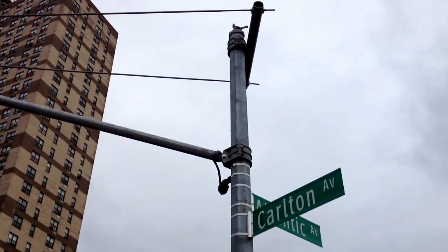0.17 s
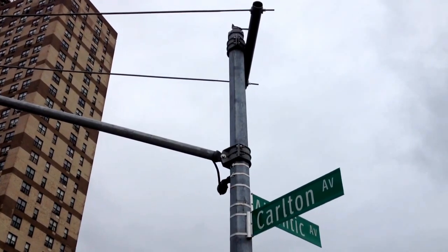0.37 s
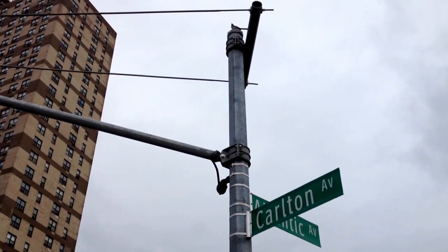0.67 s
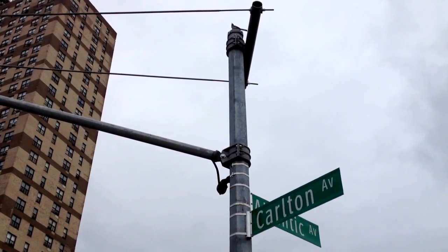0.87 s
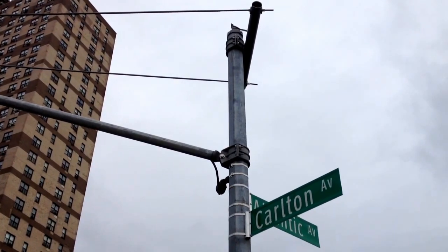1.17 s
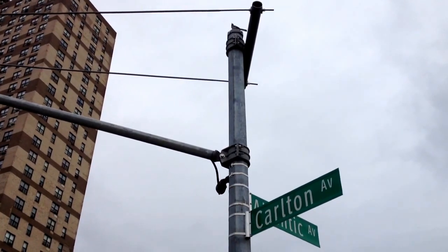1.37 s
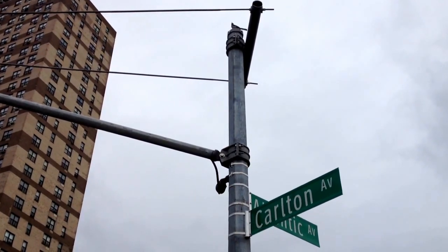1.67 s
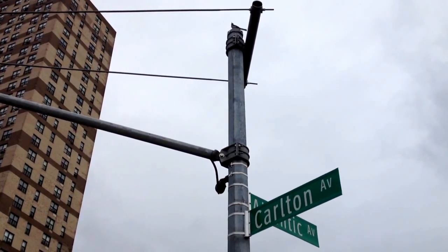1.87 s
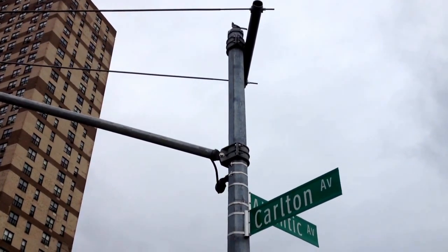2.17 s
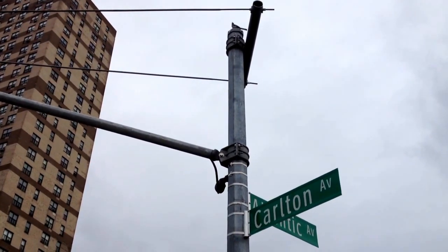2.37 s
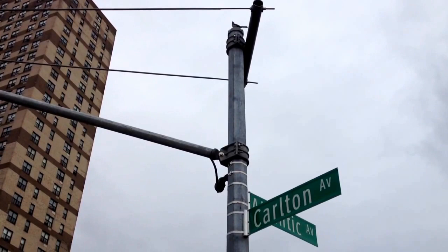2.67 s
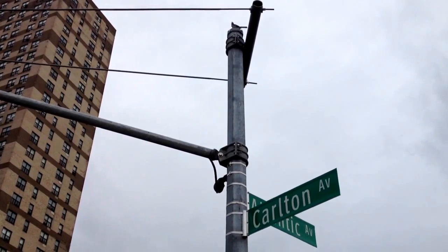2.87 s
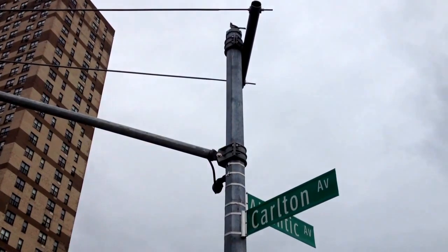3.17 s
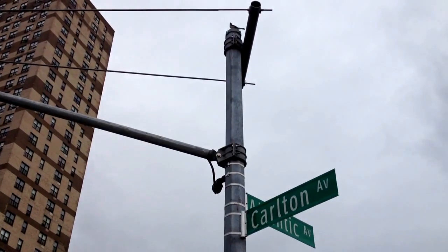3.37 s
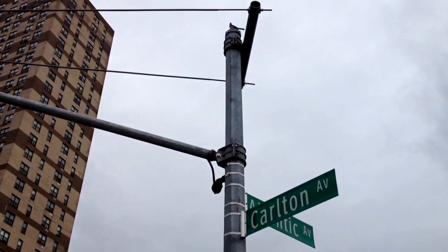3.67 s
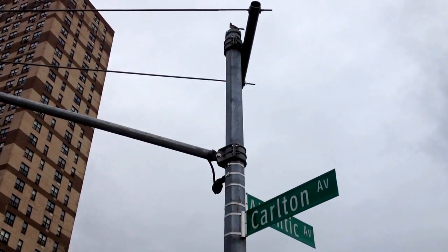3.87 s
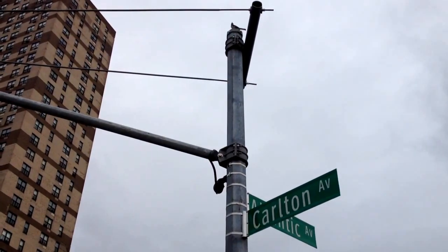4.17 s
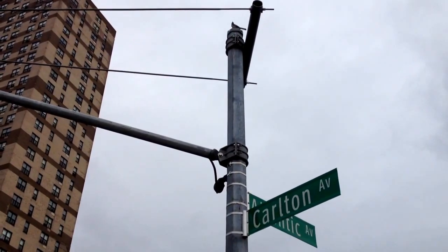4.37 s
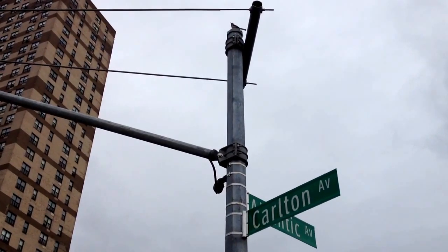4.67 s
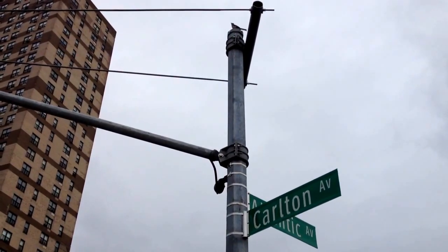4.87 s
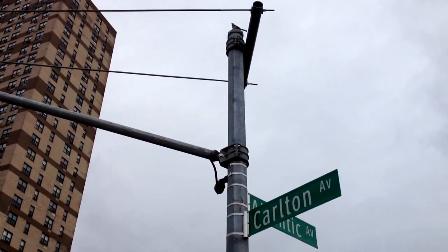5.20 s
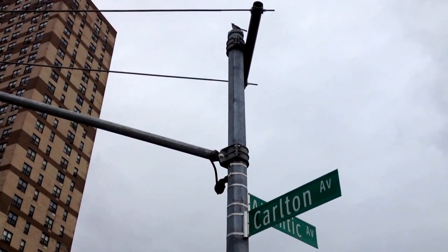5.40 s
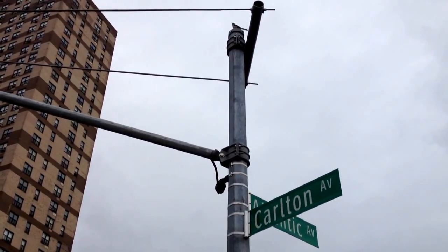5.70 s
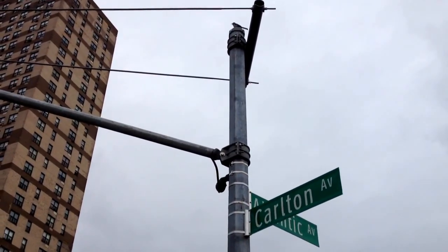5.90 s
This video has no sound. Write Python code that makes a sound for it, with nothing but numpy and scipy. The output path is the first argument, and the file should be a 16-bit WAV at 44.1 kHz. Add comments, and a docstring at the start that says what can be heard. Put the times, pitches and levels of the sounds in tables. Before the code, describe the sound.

A low, steady rumble of distant city traffic runs through all six seconds, with a faint wavering hum inside it. In front of it, a small songbird sings very short, high, sharp notes that slide downward. Two clean falling whistles come at about 0.2 and 0.7 seconds. After a pause, a rougher, broken falling note sounds at 2 seconds. Six sharp, slightly raspy chips follow, the first at 2.5 seconds and the others about every half second from 3.4 to 5.4 seconds. Two softer sliding notes come in quick succession just before 6 seconds. The buildings along the street return a faint echo of each note. A few soft, dull thumps sit in the background, most noticeably near 0.5, 1.1 and 2.6 seconds, with weaker ones later.

```python
"""Songbird on a street pole

City traffic rumbles, with a low hum and a few dull thumps. A small bird sings two clean falling
whistles, a broken falling note, six sharp chips and two soft sliding notes. The tone of its voice box
(the syrinx) glides through a throat resonance, pure when high and raspy when low.
The pavement and house fronts send back faint echoes."""
import sys
import numpy as np
from scipy import signal
from scipy.fft import rfft, irfft
from scipy.io import wavfile
from scipy.ndimage import uniform_filter1d

SR = 44100
rng = np.random.default_rng(int(sys.argv[2]) if len(sys.argv) > 2 else 0)


def master(y):
    """Save y as 16-bit WAV."""
    cut = np.clip(np.atleast_2d(y).T, -1, 1)
    pcm = np.round(cut * 32767)  # scale
    wavfile.write(sys.argv[1], SR, pcm.astype(np.int16))


N = 266319

# tone colour of the traffic: (frequency [Hz], relative level [dB])
TRAFFIC_SPECTRUM = [(25, -32), (45, -29), (65, -18), (100, -13), (160, -2.5), (300, 0), (460, -9),
                    (700, -9), (950, -13), (1700, -14), (2900, -29.5), (4800, -28.5), (8000, -41.5),
                    (15500, -50)]
# how the traffic swells and eases: (time [s], engine gain [dB], tyre gain [dB])
TRAFFIC_FLOW = [(0, -.3, 1.3), (.8, 1.7, 0.5), (1.8, 0.2, 0.7), (2.8, 1, 1), (3.6, .5, .5), (4.3, .5, 2),
                (5.1, 0.3, 2.5), (6.04, .8, 0)]
# tones of distant machinery: (pitch [Hz], level [dB])
HUM_TONES = [(121.5, -52.5), (968, -60)]
# the path the pitch takes in each kind of note: (time into the note [s], pitch [Hz])
WHISTLE = [(0, 4100), (.008, 5100), (.035, 4950), (.039, 5150), (.044, 4850), (.051, 3300), (.058, 3150),
           (.068, 3270), (.082, 3250)]
BROKEN = [(0, 1600), (.016, 3300), (.025, 5030), (.037, 4720), (.0445, 3450), (.051, 4320), (.063, 3880),
          (.069, 4080), (.075, 3100), (.083, 2700), (.103, 2250)]
CHIP = [(0, 1300), (.0135, 2480), (.032, 4370), (.062, 4245), (.0755, 4280), (.0805, 2950), (.088, 2230),
        (.107, 1550)]
LOW_SLUR = [(0, 3350), (.016, 2900), (.030, 2650), (.050, 2750)]
HIGH_SLUR = [(0, 4800), (.012, 4350), (.040, 3750), (.075, 3400)]
# kind of note: (pitch path, throat resonance [Hz], buzzes below [Hz], buzz roughness [0-1], hiss [dB])
NOTE_KINDS = { "whistle": (WHISTLE, 4710, 3550, .13, -44), "broken": (BROKEN, 4360, 3650, .7, -29),
              "chip": (CHIP, 4306, 3800, .85, -28.3), "low slur": (LOW_SLUR, 2430, 3700, .08, -40),
              "high slur": (HIGH_SLUR, 3980, 3700, .2, -30)}
# the song: (start [s], kind, length [factor], pitch [factor], pitch sag [share], late pitch lift [share],
# gain [dB], extra overtones [dB])
SONG = [ (.150, "whistle", 1.0, .995, 0, 0, -20.5, 0), (.730, "whistle", .955, 1.018, 0, 0, -22.3, 2),
        (1.990, "broken", 1.0, 1.0, 0, 0, -17.7, 0), (2.548, "chip", .96, 1.012, .02, .03, -24.5, 1),
        (3.426, "chip", .92, 1.005, 0, .05, -23.9, 0), (3.9034, "chip", 1.085, 1.0, .035, 0, -22.6, -1.5),
        (4.4736, "chip", .99, 1.008, 0, .055, -24.4, 0), (4.914, "chip", 1.02, 1.021, .005, .02, -23.3, 1),
        (5.370, "chip", 1.0, 1.0, 0, 0, -22.6, 0), (5.843, "low slur", 1.0, 1.0, 0, 0, -25, 0),
        (5.960, "high slur", 1.0, 1.0, 0, 0, -25, 0)]
# breath behind each kind of note:
# (fade-in [s], fade-out [s], swell [dB/s], opening buzz gain [dB], closing buzz gain [dB])
BREATH = { "whistle": (.006, .013, 150, -12, -14), "broken": (.010, .019, 35, -14, -4.5),
          "chip": (.010, .023, 120, -12.5, -6.8), "low slur": (.014, .024, 130, 0, 0),
          "high slur": (.014, .033, 0, 0, 0)}
# brief pushes (+) and catches (-) of breath: (kind, time into the note [s], half length [s], gain [dB])
BREATH_ACCENTS = [ ("whistle", .0416, .0052, -17), ("whistle", .0615, .003, -4), ("chip", .015, .004, 4.5),
                  ("chip", .0795, .0017, -7), ("low slur", .0335, .003, -10)]
# overtone strength of each kind of note: (pure tone [dB], opening buzz [dB], closing buzz [dB])
OVERTONES = { "whistle": (-12, 8, -14), "broken": (-10, 11, -12), "chip": (-8, 13.5, -3),
             "low slur": (-10, -3, -12), "high slur": (-6, -6, -9)}
# the open beak lifts the treble: (frequency [Hz], gain [dB])
BEAK_GAIN = [(5500, 0), (7300, -5), (8700, 1), (10300, 3), (11600, 4), (12900, 11), (14200, 5), (15500, 1)]
# tone colour of the hiss and scratch in each note: (frequency [Hz], relative level [dB])
HISS_SPECTRUM = [(1500, -20), (3000, 8), (6000, 8.5), (7300, -11.5), (8900, 16), (10300, -3), (11700, 3),
                 (12900, 7), (14000, -9), (15500, -34)]
# echoes from the house fronts: (delay [s], gain [dB])
HOUSE_ECHOES = [(.062, -43.5), (.135, -46), (.165, -41), (.29, -48)]
# dull thumps: (start [s], pitch [Hz], rough length [s], level [dB])
THUMPS = [(.458, 240, .02, -32), (.488, 190, .024, -31), (1.098, 190, .016, -29.5), (2.605, 160, .025, -33),
          (2.626, 180, .02, -30.5), (2.90, 140, .06, -40), (2.97, 160, .05, -39), (4.008, 280, .012, -38),
          (5.07, 140, .04, -37), (5.91, 140, .05, -39), (6.01, 170, .03, -35)]


def undb(db):
    """Turn decibels into a factor to multiply by."""
    return 10 ** (np.asarray(db) / 20)


def unit(x):
    """Scale a signal to an average (rms) size of 1."""
    return x / np.sqrt(np.mean(x ** 2))


def colour_db(hz, points):
    """Read a level between the points of a spectrum, with octaves evenly spaced."""
    point_hz, db = np.transpose(points)
    return np.interp(np.log(np.maximum(hz, 1)), np.log(point_hz), db)


def noise(size, points):
    """Noise with the given tone colour, average size 1."""
    gain = undb(colour_db(np.fft.rfftfreq(size, 1 / SR), points))
    return unit(irfft(rfft(rng.standard_normal(size)) * gain, size))


def wander(size, rate_hz):
    """A smooth random wobble, mostly slower than the given rate, average size 1."""
    hz = np.fft.rfftfreq(size, 1 / SR)
    return unit(irfft(rfft(rng.standard_normal(size)) * (hz > 0) / (1 + (hz / rate_hz) ** 4), size))


def add(track, start_s, sound):
    """Mix a sound in at a given time."""
    start = max(int(start_s * SR), 0)
    track[start:start + len(sound)] += sound[:N - start]


def traffic(level_db=-39.5, split_hz=700, rumble_sway_db=.73, hiss_sway_db=.53):
    """Far engines rumble unevenly below a smoother wash of tyres."""
    times, rumble_db, hiss_db = np.transpose(TRAFFIC_FLOW)
    t = np.arange(N) / SR
    wash = noise(N, TRAFFIC_SPECTRUM) * undb(level_db)
    rumble = signal.sosfiltfilt(signal.butter(2, split_hz, fs=SR, output="sos"), wash)
    engines = rumble * undb(np.interp(t, times, rumble_db) + rumble_sway_db * wander(N, 18))
    tyres = (wash - rumble) * undb(np.interp(t, times, hiss_db) + hiss_sway_db * wander(N, 5.8))
    return engines + tyres


def hum(drift_share=.0115, sway_db=1.0):
    """Distant machinery holds faint wavering tones."""
    out = 0
    for hz, db in HUM_TONES:
        phase = 2 * np.pi * np.cumsum(hz * (1 + drift_share * wander(N, 6.6))) / SR
        out = out + undb(db) * unit(np.sin(phase) * undb(sway_db * wander(N, 9)))
    return out


def note_shape(kind, t, blend_hz=125, edge_db=-21, pure_roughness=.02, catch_share=.7):
    """Pitch, breath, overtones and roughness: low pitches buzz, brightly at first and duller later."""
    path, _, buzz_below_hz, buzz_roughness, _ = NOTE_KINDS[kind]
    fade_in_s, fade_out_s, swell_db_per_s, *buzz_gain_db = BREATH[kind]
    pure_db, *buzz_db = OVERTONES[kind]
    ends = [0, t[-1]]
    hz = uniform_filter1d(np.interp(t, *np.transpose(path)), size=90)
    buzz = .5 - .5 * np.tanh(.5 * (hz - buzz_below_hz) / blend_hz)  # 0 is pure, 1 is all buzz
    fade = np.maximum(1 - t / fade_in_s, 0) + np.maximum(1 - (t[-1] - t) / fade_out_s, 0)
    accent_db = sum(db * np.exp(-((t - at_s) / half_s) ** 2)
                    for name, at_s, half_s, db in BREATH_ACCENTS if name == kind)
    breath_db = swell_db_per_s * t + buzz * np.interp(t, ends, buzz_gain_db) + edge_db * fade + accent_db
    bright_db = (1 - buzz) * pure_db + buzz * np.interp(t, ends, buzz_db)
    bright_db -= catch_share * np.minimum(accent_db, 0)  # overtones escape most of a catch of breath
    roughness = np.clip(pure_roughness + buzz_roughness * buzz, 0, 1)
    return hz, breath_db, bright_db, roughness


def throat(hz, centre_hz, sharpness=4):
    """The throat favours frequencies near its resonance, and the beak lifts the treble."""
    off_centre = hz / centre_hz - centre_hz / hz
    return undb(colour_db(hz, BEAK_GAIN)) / np.sqrt(1 + (sharpness * off_centre) ** 2)


def syrinx(kind, stretch, pitch, sag, lift, extra_db, jitter=.078, waver=.0027, flutter_db=.1,
           lift_at_s=.073, lift_half_s=.0045, throat_slide=.22, octave_db=-6.5, even_db=-4,
           scratch_db=-16, scratch_s=.012, blur_db=-7):
    """A membrane vibrates; on steep glides one overtone after another crosses the throat resonance."""
    path, centre_hz, *_, hiss_db = NOTE_KINDS[kind]
    length_s = path[-1][0]
    size = int(length_s * stretch * SR)
    t = np.arange(size) / SR / stretch
    progress = 2 * t / length_s - 1  # -1 at the start, +1 at the end
    hz, breath_db, bright_db, roughness = note_shape(kind, t)
    breath = undb(breath_db + flutter_db * wander(size, 150))
    # the membrane slackens through the note and tightens briefly just before it lets go
    tighten = np.exp(-((t - lift_at_s) / lift_half_s) ** 2)
    hz = hz * pitch * (1 - sag * progress + lift * tighten)
    hz = hz * (1 + jitter * roughness * wander(size, 1160) + waver * wander(size, 200))
    phase = 2 * np.pi * np.cumsum(hz) / SR
    throat_hz = centre_hz * (1 - throat_slide * roughness * progress)  # slides down in a rasp
    tone = throat(hz, throat_hz) * np.sin(phase)
    for k in range(2, 12):  # overtones at k times the pitch
        overtone_db = extra_db + bright_db + octave_db * np.log2(k / 2) + even_db * (k % 2 == 0)
        gain = undb(overtone_db + .95 * wander(size, 180))
        tone += gain * throat(k * hz, throat_hz) * (k * hz < SR / 2) * np.sin(k * phase)
    tone *= breath * (1 + .35 * roughness * wander(size, 800))
    # a band of noise near the throat's resonance blurs the note's raspy edges
    rasp = breath * roughness
    band = throat(np.fft.rfftfreq(size, 1 / SR) + 1, centre_hz) ** 2
    band_noise = unit(irfft(rfft(rng.standard_normal(size)) * band, size))
    blur = undb(blur_db) * band_noise * uniform_filter1d(rasp, size=220)
    # a hiss follows the tone, with a brief scratch at the raspy parts
    scratch = uniform_filter1d(rasp, int(scratch_s * SR))
    scratch *= undb(scratch_db + np.minimum(bright_db, 0) / 2)
    hiss = (undb(hiss_db) * breath + scratch) * noise(size, HISS_SPECTRUM)
    return tone + blur + hiss


def bird():
    """The bird sings each note in the shape of its kind, varying the length, pitch and loudness."""
    out = np.zeros(N)
    for start_s, kind, stretch, pitch, sag, lift, db, extra_db in SONG:
        add(out, start_s, undb(db) * syrinx(kind, stretch, pitch, sag, lift, extra_db))
    return out


def street_echoes(song, pavement_s=.0104, pavement_db=-11.5, beam_hz=3400,
                  near_fade_s=.2, near_db=-25, tail_fade_s=1.75, tail_db=-27.6, dull_hz=5000):
    """Sound bounces off the pavement, scatters from the pole and lingers between the buildings."""
    t = np.arange(SR) / SR
    near = unit(rng.standard_normal(SR) * undb(-60 * t / near_fade_s)) / np.sqrt(SR)
    # thin parts of the pole scatter treble best
    near = near + 4 * signal.sosfilt(signal.butter(4, 7000, "high", fs=SR, output="sos"), near)
    far = undb(tail_db) * unit(rng.standard_normal(SR) * undb(-60 * t / tail_fade_s)) / np.sqrt(SR)
    for delay_s, db in HOUSE_ECHOES:
        far[int(delay_s * SR)] += undb(db)
    far = signal.sosfilt(signal.butter(3, dull_hz, fs=SR, output="sos"), far)  # air and brick dull it
    # the beak beams the treble away from the pavement
    downward = signal.sosfilt(signal.butter(1, beam_hz, fs=SR, output="sos"), song)
    bounce = np.zeros(N)
    add(bounce, pavement_s, undb(pavement_db) * downward)
    return song + bounce + signal.fftconvolve(song, undb(near_db) * near + far)[:N]


def thumps():
    """Short bursts of low noise swell and die away."""
    out = np.zeros(N)
    t = np.arange(SR // 2) / SR
    for start_s, hz, length_s, db in THUMPS:
        age = 2 * t / length_s  # loudest at age 1
        spectrum = [(hz / 3, -30), (hz / 1.3, -1), (hz * 1.3, 0), (hz * 3, -20), (hz * 20, -65)]
        add(out, start_s, undb(db) * noise(len(t), spectrum) * age * np.exp(1 - age))
    return out


def scene():
    """The bird and its echoes over the sounds of the city, in one channel."""
    return (street_echoes(bird()) + traffic() + hum() + thumps())[None]


def record(dry, bass_hz=45, top_hz=15300):
    """The microphone thins the deepest bass and the recorder cuts the highest treble."""
    thin = signal.sosfilt(signal.butter(2, bass_hz, "high", fs=SR, output="sos"), dry)
    return signal.sosfilt(signal.ellip(10, .2, 80, top_hz, fs=SR, output="sos"), thin)


dry = scene()
out = record(dry)
master(out)
```